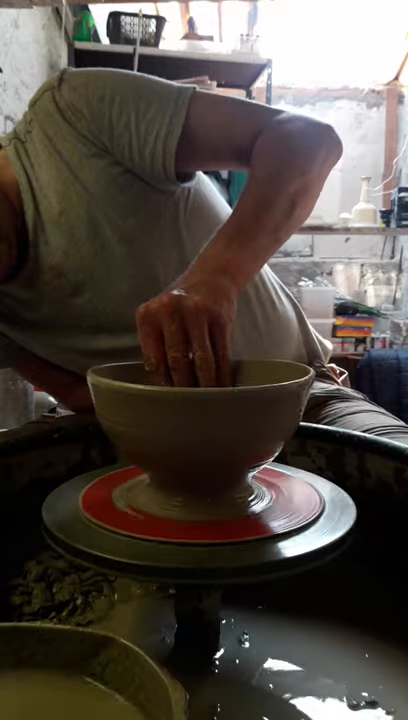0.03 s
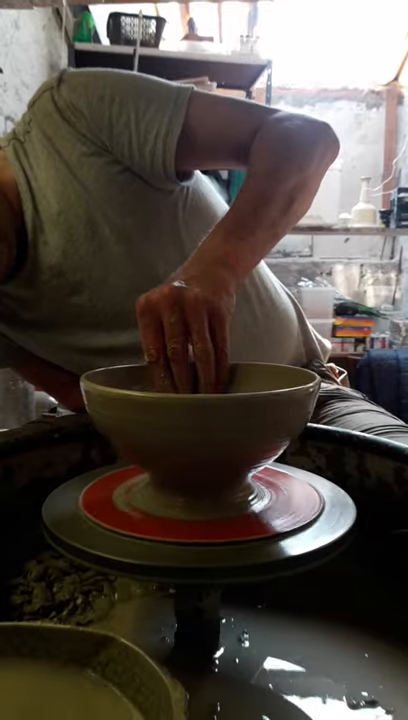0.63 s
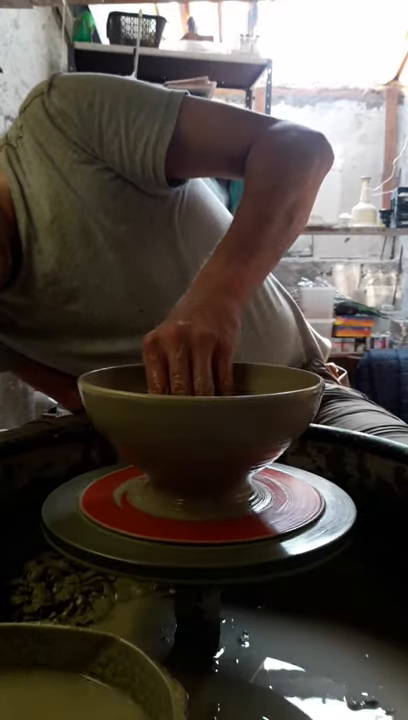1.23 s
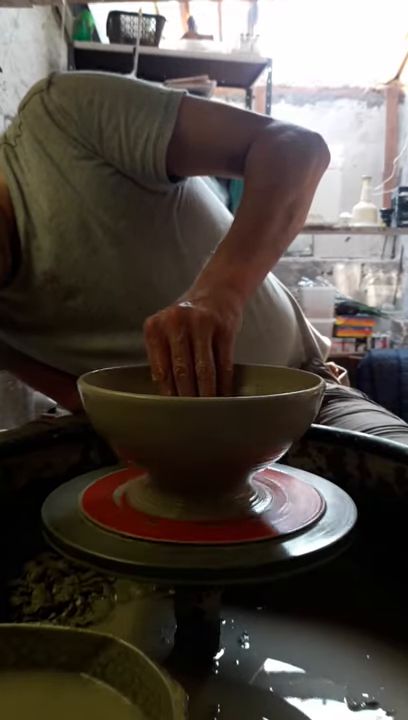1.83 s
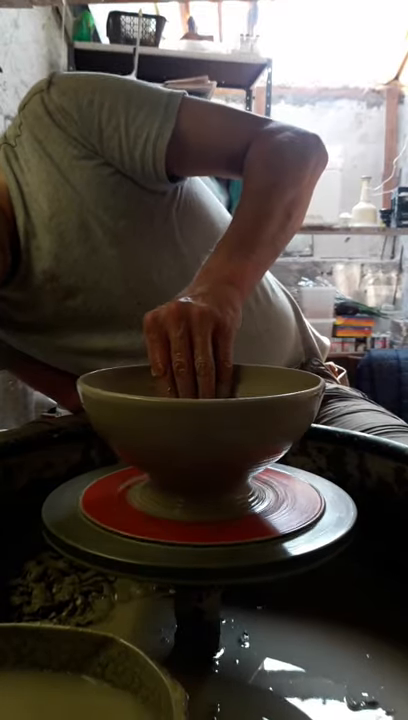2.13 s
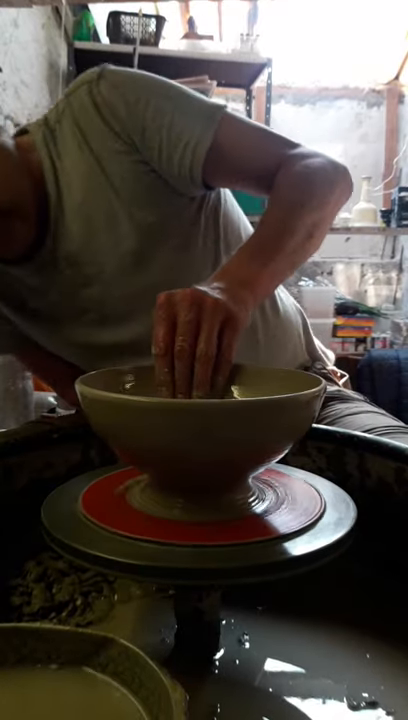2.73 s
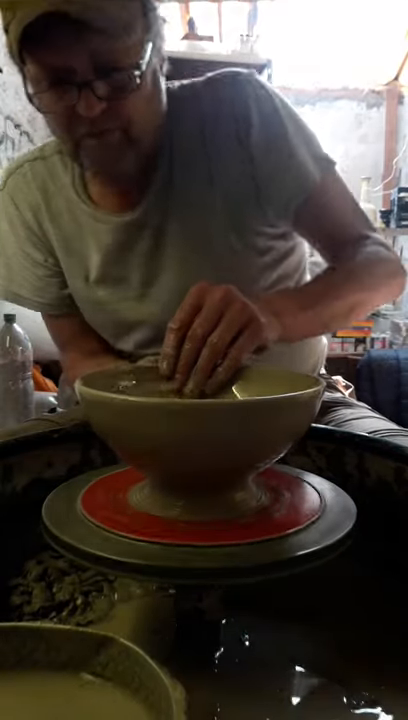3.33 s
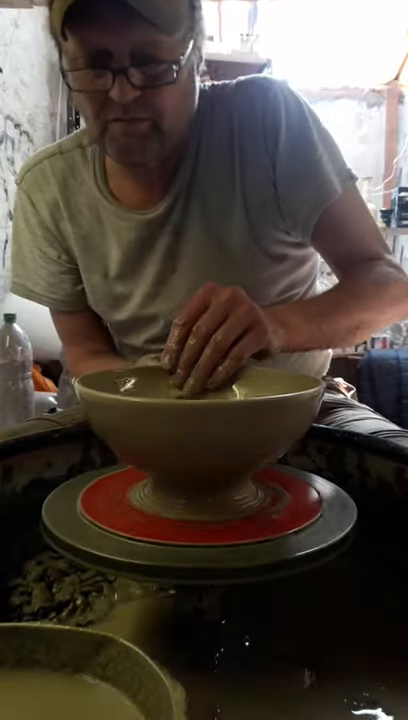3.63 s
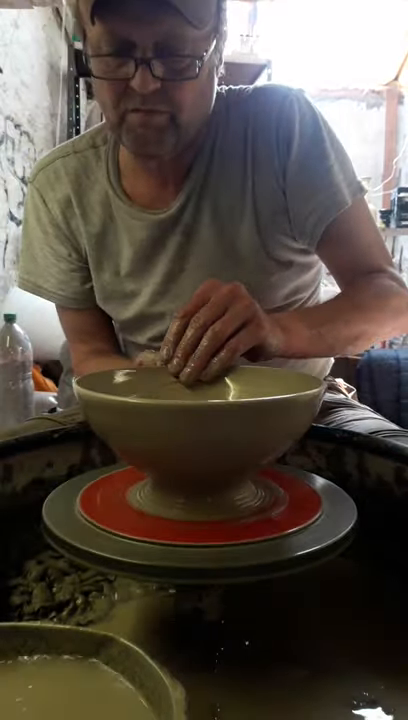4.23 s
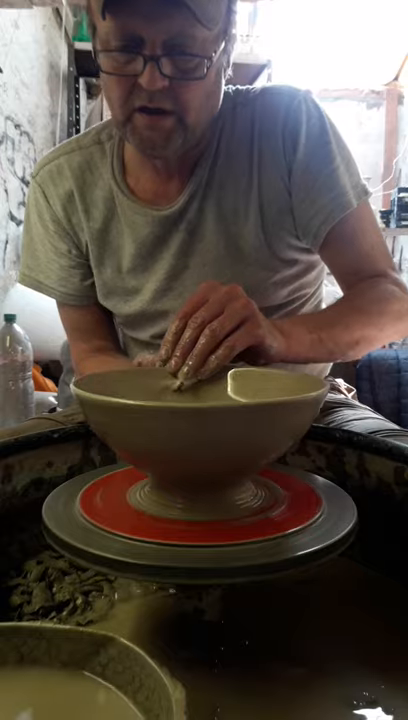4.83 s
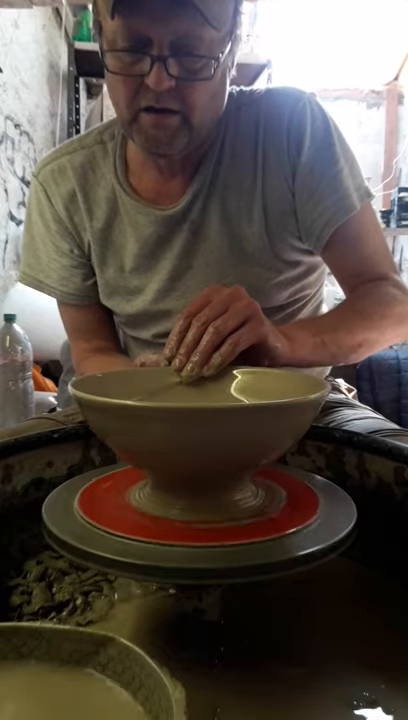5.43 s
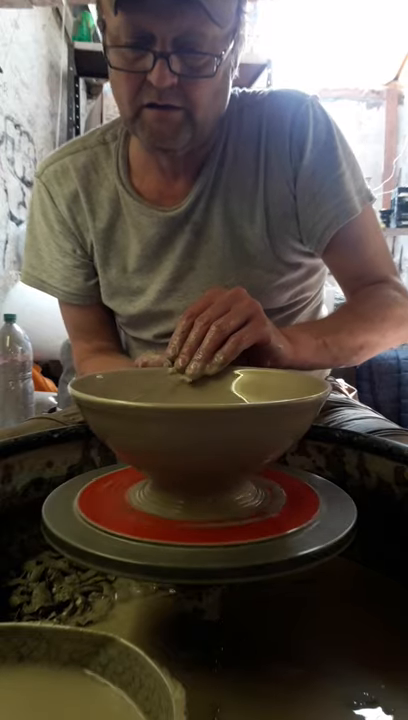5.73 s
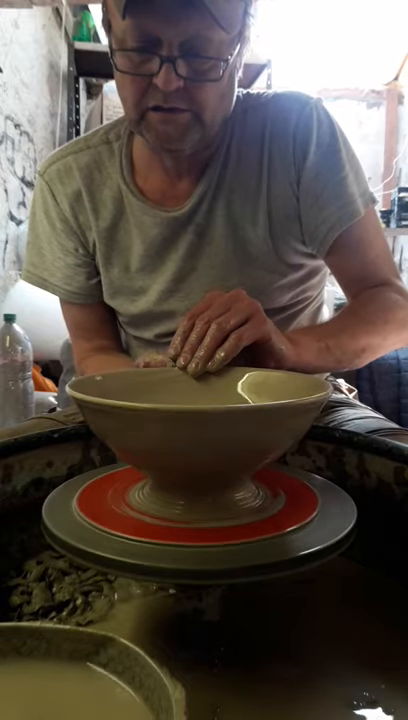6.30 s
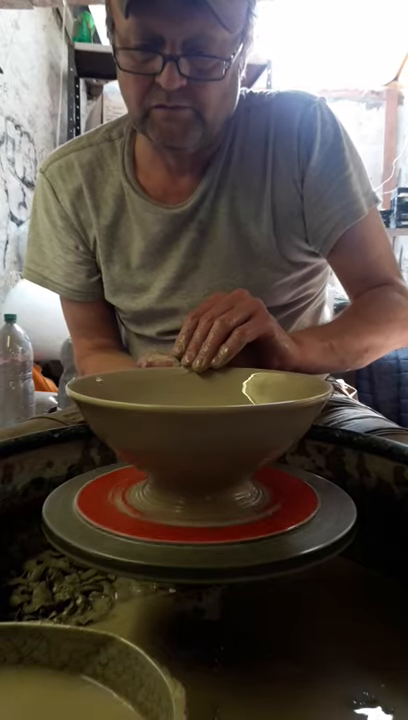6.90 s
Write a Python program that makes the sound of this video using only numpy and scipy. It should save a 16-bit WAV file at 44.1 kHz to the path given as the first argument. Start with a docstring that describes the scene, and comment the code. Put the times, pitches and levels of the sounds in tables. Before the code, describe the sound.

A low, throbbing motor hum and a fast, uneven rattle come from an electric pottery wheel running throughout. Its bearings rumble and its belt scuffs lightly in time with the pulse. On top, wet clay quietly hisses, clicks and crackles under the potter's fingers, the hiss rising slightly past the middle. The sound is near, with just a short, slight echo from a small room.

```python
"""A throbbing hum with a fast rattle: an electric pottery wheel turning in a workshop.
The motor hums at twice the mains frequency and throbs with the belt pulleys. A loose part of the drive
knocks once per hum cycle, hardest when the belt pulls, and rings the frame. Bearings rumble, the belt
scuffs, and wet clay softly hisses, rubs and crackles under the potter's fingers."""
import sys
import numpy as np
from scipy import signal
from scipy.fft import rfft, irfft, next_fast_len
from scipy.io import wavfile
from scipy.ndimage import uniform_filter1d

SR = 44100
rng = np.random.default_rng(int(sys.argv[2]) if len(sys.argv) > 2 else 0)


def wrap_up_sound(samples):
    """Save the sound to the file named by the first command line argument, as 16-bit audio."""
    columns = np.atleast_2d(samples).T
    # keep every value between -1 and 1, then stretch to whole-number steps
    tamed = np.clip(columns, -1, 1)
    steps = np.round(tamed * 32767).astype(np.int16)
    wavfile.write(sys.argv[1], SR, steps)


N = 315756

# potter's work, pressing harder at the rim in the second half: (time [s], hum [dB], clay hiss [dB])
WORK = [(0.1, -18.5, -49), (0.29, -19, -50.5), (3.35, -18, -50.5), (4.27, -18, -45.5), (7.0, -17.5, -44.5)]


def undb(db):
    """Decibels to gain."""
    return 10 ** (np.asarray(db) / 20)


def unit(x):
    """Scale to rms 1."""
    return x / np.sqrt(np.mean(x ** 2))


def curve(table, t, column=1):
    """Linear interpolation of one table column."""
    rows = np.array(table)
    return np.interp(t, rows[:, 0], rows[:, column])


def colour(x, points):
    """Minimum-phase filter from (frequency [Hz], gain [dB]) points."""
    hz, db = np.transpose(points)
    size = next_fast_len(len(x) + SR // 10)
    size += size % 2
    bins_hz = np.maximum(np.fft.rfftfreq(size, 1 / SR), 1)
    gain = undb(np.interp(np.log(bins_hz), np.log(hz), db))
    cepstrum = irfft(np.log(gain))
    cepstrum[1:size // 2] *= 2
    cepstrum[size // 2 + 1:] = 0
    return irfft(rfft(x, size) * np.exp(rfft(cepstrum)))[:len(x)]


def noise(points):
    """Coloured noise, rms 1."""
    return unit(colour(rng.standard_normal(N), points))


def resonate(x, hz, width_hz):
    """One resonance, gain 1 at its centre."""
    return signal.lfilter(*signal.iirpeak(hz, hz / width_hz, fs=SR), x)


def walk(rate_hz):
    """Smooth random wander, rms 1."""
    hold = max(int(SR / rate_hz), 1)
    steps = np.repeat(rng.standard_normal(N // hold + 1), hold)[:N]
    return unit(uniform_filter1d(steps, hold))


def grains(rate_hz, spread_db):
    """Sparse impulses of uneven size."""
    impulses = (rng.random(N) < rate_hz / SR) * rng.choice([-1, 1], N)
    return impulses * undb(spread_db * np.clip(rng.standard_normal(N), -2, 2))


def soft_limit(db, ceiling_db, knee_db):
    """Bend a level gently under a ceiling."""
    return ceiling_db - knee_db * np.logaddexp(0, (ceiling_db - db) / knee_db)


def motor(t, cycles, swell_db, load_db, gain_db=-0.5, waver_db=0.54, flutter_db=2):
    """Magnetic hum with a steady third harmonic; under load more overtones grow and trail behind."""
    angle = 2 * np.pi * cycles
    steady = np.cos(angle) - undb(-20) * np.cos(3 * angle)
    lag_cycles = 0.0045 * load_db + 0.011 * walk(25)
    trailing = angle - 2 * np.pi * lag_cycles
    second = undb(-22 + 0.61 * load_db + flutter_db * walk(8.2)) * np.cos(2 * trailing)
    third = undb(-21 + 0.5 * load_db + flutter_db * walk(12)) * np.cos(3 * trailing)
    level_db = curve(WORK, t) + gain_db + swell_db + waver_db * walk(24)
    return np.sqrt(2) * undb(level_db) * (steady - second - third)


def drive(t, pulley_hz=6.087, idler_hz=20.412, wheel_hz=2.15):
    """Pulley, idler and wheel head run slightly out of true, varying hum level and belt load."""
    # one turn of the uneven pulley: (phase [turns], hum swell [dB], belt load [dB])
    turn = [(0, 0.66, 22), (0.102, 0.5, 12.5), (0.202, 2, -14.5), (.3, -0.5, -12.5), (0.399, -0.5, -18),
            (0.5, -0.5, 2), (.6, 0.8, -1.5), (.75, 0.7, 8), (0.868, 0.35, -0.5)]
    phase, *columns = np.transpose(turn)
    swell_db, load_db = (np.interp(t * pulley_hz, phase, db, period=1) for db in columns)
    idler = np.cos(2 * np.pi * idler_hz * (t - 0.022))
    wheel = np.cos(2 * np.pi * wheel_hz * (t - 0.052))
    return swell_db + 0.5 * wheel, load_db + 6.5 * idler + 3.5 * wheel


def strikes(t, cycles, load_db, lag_cycles=0.04, delay_s_per_db=0.00009, jitter_s=0.0002, base_db=-31):
    """The loose part strikes just after each hum crest, as hard as the belt pulls."""
    # knocks that stand out of the rattle: (time [s], level [dB])
    hard_knocks = [(0.165, -13.5), (0.508, -14.5), (0.655, -15.5), (0.997, -12.5), (1.487, -13.5),
                   (1.638, -14), (1.928, -15.5), (1.978, -11.5), (2.417, -16.5), (2.809, -13.5),
                   (2.948, -11.5), (2.959, -12.5), (3.299, -14), (3.459, -14), (3.78, -17), (4.088, -20),
                   (4.921, -14), (5.263, -11.5), (5.591, -14), (5.751, -14), (6.573, -15), (7.064, -16.5)]
    at = np.flatnonzero(np.diff(np.floor(cycles - lag_cycles)))
    force, brightness, lateness = rng.standard_normal((len(at), 3)).T
    thud_db = soft_limit(base_db + 0.65 * load_db[at] + 4.5 * force, ceiling_db=-18, knee_db=3)
    # a harder throw lands later and is brighter
    times_s = t[at] + delay_s_per_db * (thud_db - base_db) + jitter_s * lateness
    for knock_s, knock_db in hard_knocks:
        nearest = np.argmin(np.abs(times_s - knock_s))
        times_s[nearest] = knock_s + 0.0015
        thud_db[nearest] = knock_db - 2
        brightness[nearest] = 0
    snap_db = -38 + 1.154 * (thud_db - base_db) + 7.5 * np.minimum(brightness, 1)
    return times_s, thud_db, snap_db


def rattle(times_s, thud_db, snap_db, contact_s=0.00055, cutoff_hz=3800, frame_db=-4):
    """Each strike is a flat push for the contact time, which rings the frame, plus a bright snap."""
    # modes of frame and splash pan: (frequency [Hz], width [Hz], gain [dB])
    modes = [(200, 15, -6), (276, 5.9, 12), (371, 16.5, 14), (788, 140, 0.5), (1150, 140, -3.5),
             (2480, 970, 0.5)]
    # contact snap: (frequency [Hz], gain [dB])
    snap_spectrum = [(1500, -26.5), (2800, 1.5), (4600, -8), (6500, 4.5), (9000, -4), (11500, -1),
                     (14500, -15)]
    at = np.clip((times_s * SR).astype(int), 0, N - 1)
    thuds, snaps = np.zeros((2, N))
    thuds[at] = -undb(thud_db - 0.5)
    snaps[at] = -undb(snap_db + 13)
    push = np.clip(contact_s * SR - np.arange(SR // 500), 0, 1)
    blows = signal.lfilter(*signal.butter(2, cutoff_hz, fs=SR), np.convolve(thuds, push)[:N])
    frame = sum(undb(db) * resonate(blows, hz, width_hz) for hz, width_hz, db in modes)
    return blows + undb(frame_db) * frame + colour(snaps, snap_spectrum)


def bearings(load_db, level_db=-28, flicker_db=0.5):
    """Low rolling noise that swells as the belt pulls."""
    # rumble of bearings and belt: (frequency [Hz], density [dB])
    spectrum = [(20, -53), (50, -18), (75, -6), (115, 7.5), (140, -3), (180, 3.5), (214, 6.5), (250, 3),
                (280, 5.5), (330, 0), (390, -0.5), (440, -6.5), (540, -16), (1600, -50.5)]
    smooth_load_db = uniform_filter1d(load_db, SR // 50)
    return undb(level_db + 0.17 * smooth_load_db + flicker_db * walk(25)) * noise(spectrum)


def belt(load_db, level_db=-45, flicker_db=2.34):
    """The belt scuffs over the pulley, more when it pulls."""
    # belt scuff: (frequency [Hz], density [dB])
    spectrum = [(300, -0.5), (650, 8.5), (1300, -0.5), (1850, -6), (2650, -8), (4300, -9.5), (6200, -12.5),
                (12000, -20)]
    return undb(level_db + 0.2 * load_db + flicker_db * walk(30)) * noise(spectrum)


def clay(t, gain_db=1.5, flicker_db=2.5, grit_db=-12):
    """Fingers slide on wet clay: smooth hiss with a few sandy grains."""
    # sliding wet clay: (frequency [Hz], density [dB])
    spectrum = [(400, -8), (800, 0), (1300, 1.5), (1850, -0.5), (2400, 1.5), (2680, 5), (3050, -1.5),
                (3650, 5), (4400, -1), (5800, -2), (8000, -20.5), (12000, -16.5)]
    hiss = noise(spectrum)
    grit = unit(colour(grains(rate_hz=250, spread_db=5), spectrum))
    level_db = curve(WORK, t, column=2) + gain_db + flicker_db * walk(45)
    return undb(level_db) * (hiss + undb(grit_db) * grit)


def rubs(t, half_width_s=0.018):
    """A finger catches on the clay: a short swell of dense wet grains."""
    # finger catches: (time [s], level [dB])
    catches = [(1.825, -39), (2.177, -40.5), (2.655, -41.5), (3.33, -42.5), (4.72, -39)]
    # wet rub: (frequency [Hz], density [dB])
    spectrum = [(600, -16), (1350, 6), (1900, -5.5), (2700, -1), (4200, -15), (8000, -28)]
    envelope = sum(undb(db) * np.exp(-((t - at_s) / half_width_s) ** 2) for at_s, db in catches)
    return envelope * unit(colour(grains(rate_hz=2500, spread_db=3), spectrum))


def wet_slip(load_db, click_gain_db=13, crackle_db=-39, base_rate_hz=110):
    """The wet film clicks under the fingers and crackles faster as the drive shakes the bowl."""
    # wet clay clicks: (time [s], level [dB])
    clicks = [(1.1644, -31), (2.6245, -27), (2.9254, -25)]
    # crackle of the film: (frequency [Hz], gain [dB])
    spectrum = [(1500, -25), (3500, 1), (6500, 3.5), (9000, 4), (11500, -1), (14500, 3)]
    impulses = undb(crackle_db) * grains(base_rate_hz * undb(0.86 * load_db), spread_db=4)
    for at_s, db in clicks:
        impulses[int(at_s * SR)] += undb(db + click_gain_db)
    return colour(impulses, spectrum)


def bubbles(load_db, base_rate_hz=14, min_db=-47, range_db=10, low_hz=5500, high_hz=13000,
            decay_s=0.0018):
    """Tiny air pockets in the slip burst as the bowl shakes, each with its own high ping."""
    age_s = np.arange(SR // 200) / SR
    envelope = np.exp(-age_s / decay_s)
    pings = np.zeros(N + len(age_s))
    at = np.flatnonzero(rng.random(N) < base_rate_hz * undb(load_db) / SR)
    for start, (pitch, strength) in zip(at, rng.random((N, 2))[at]):
        hz = low_hz * (high_hz / low_hz) ** pitch
        ping = envelope * np.sin(2 * np.pi * hz * age_s)
        pings[start:start + len(ping)] += undb(min_db + range_db * strength) * ping
    return pings[:N]


def workshop(x, gain_db=-15, predelay_s=0.0041, t60_s=0.55):
    """Short diffuse echo of a small cluttered room."""
    # room echo: (frequency [Hz], gain [dB])
    spectrum = [(400, -12), (1000, 3), (3000, 0), (6000, -14), (12000, -12)]
    t = np.arange(SR // 2) / SR
    tail = rng.standard_normal(len(t)) * np.exp(-np.log(1000) * t / t60_s) * (t > predelay_s)
    echo = signal.fftconvolve(x, tail / np.linalg.norm(tail))[:N]
    return undb(gain_db) * colour(echo, spectrum)


def scene(hum_hz=99.882):
    """Hum, rattle, scuff and rumble share one drive; the clay sounds lie on top."""
    t = np.arange(N) / SR
    cycles = hum_hz * t - 0.5
    swell_db, load_db = drive(t)
    # the belt gives under the hardest pulls, so strain on motor and bearings levels off
    strain_db = soft_limit(load_db, ceiling_db=17, knee_db=4)
    knocks = rattle(*strikes(t, cycles, load_db))
    hum = motor(t, cycles, swell_db, strain_db)
    machine = hum + knocks + workshop(knocks) + belt(load_db) + bearings(strain_db)
    return (machine + clay(t) + rubs(t) + wet_slip(load_db) + bubbles(load_db))[None]


def record(dry, low_hz=24, top_hz=15700):
    """The microphone colours the treble and cuts the deepest bass and the top."""
    # microphone port: (frequency [Hz], gain [dB])
    port = [(5500, 0), (6500, -0.5), (7300, -6.5), (8300, -11), (9600, -13.5), (10600, -5.5), (11700, -3.5),
            (13300, -8), (15500, -14)]
    highpass = signal.butter(2, low_hz, "high", fs=SR, output="sos")
    lowpass = signal.ellip(12, 0.1, 90, top_hz, fs=SR, output="sos")
    heard = signal.sosfilt(highpass, colour(dry[0], port))
    return signal.sosfilt(lowpass, heard)[None]


dry = scene()
out = record(dry)
wrap_up_sound(out)
```